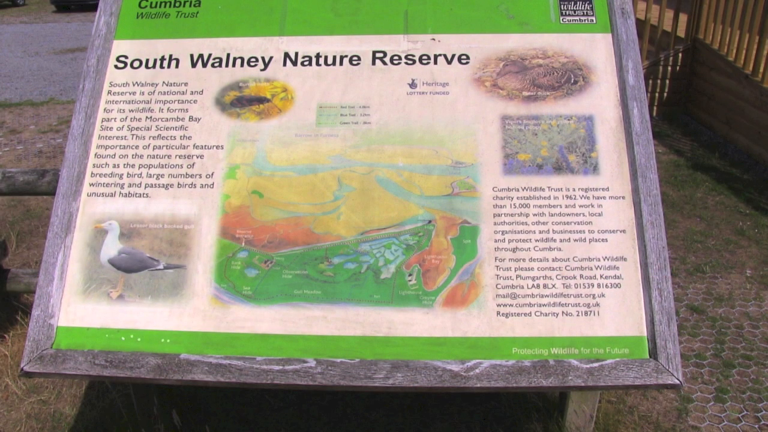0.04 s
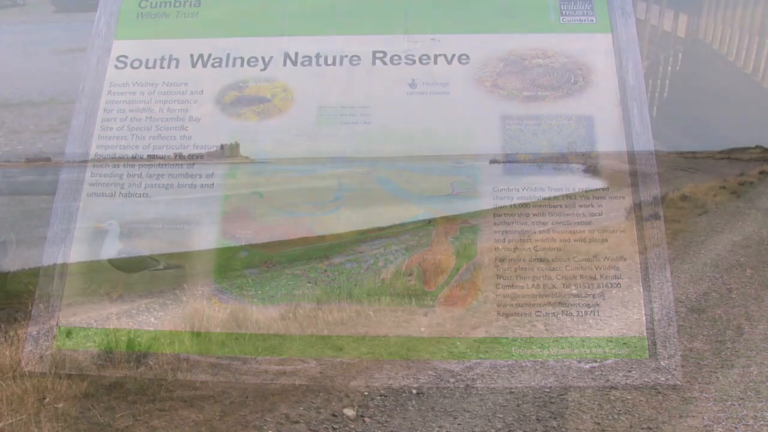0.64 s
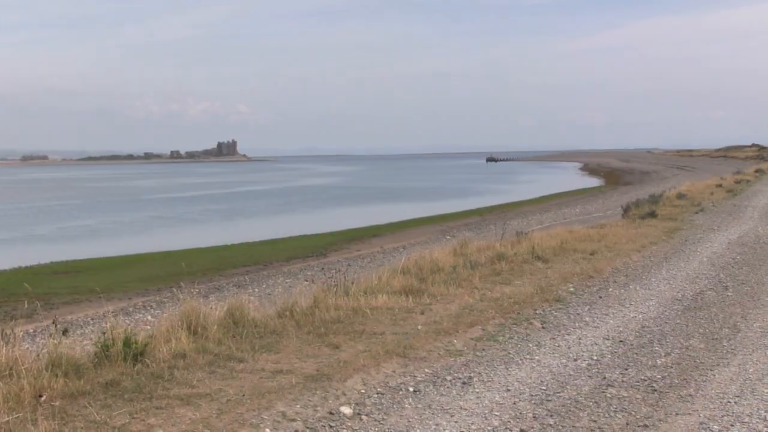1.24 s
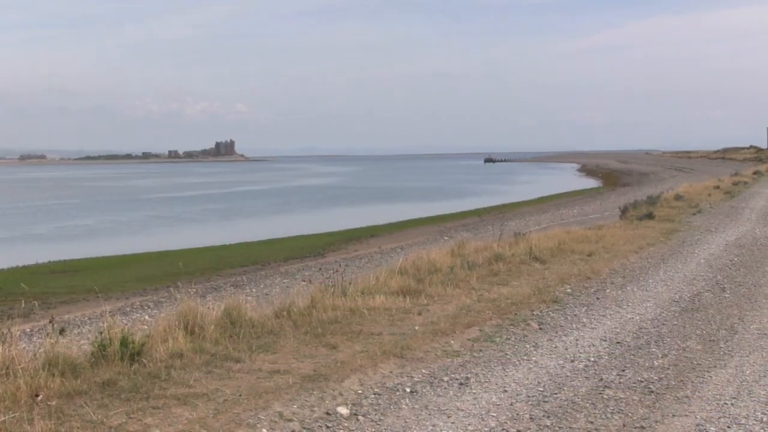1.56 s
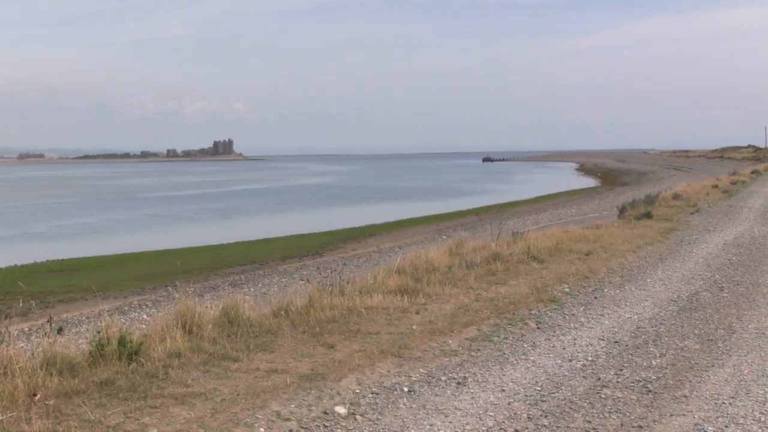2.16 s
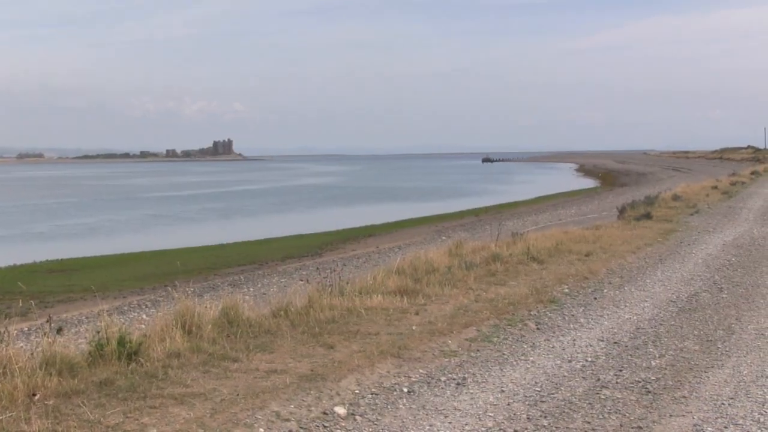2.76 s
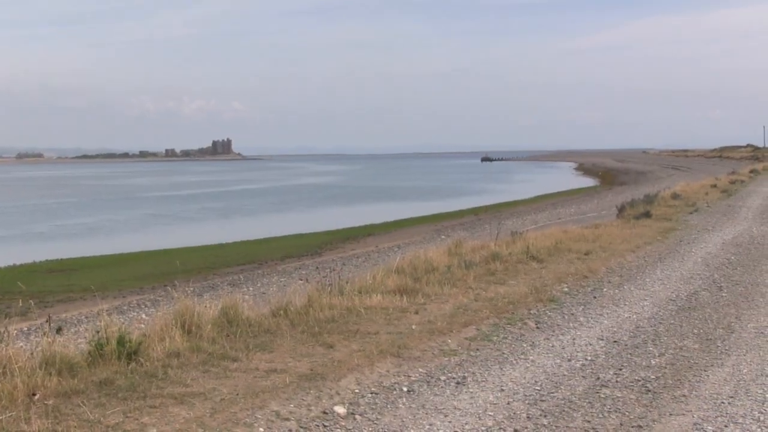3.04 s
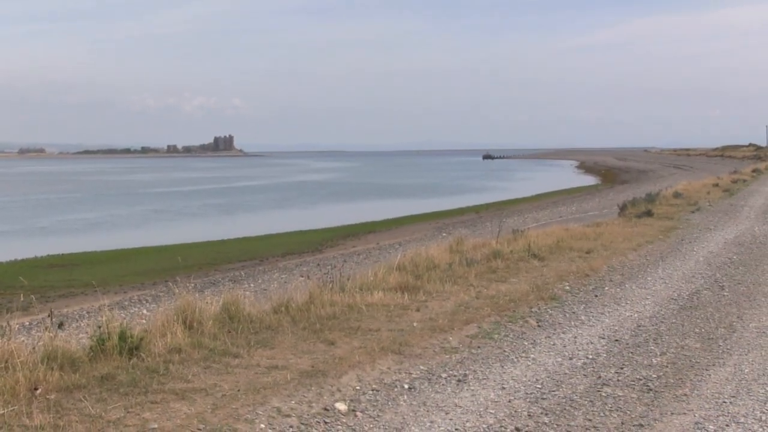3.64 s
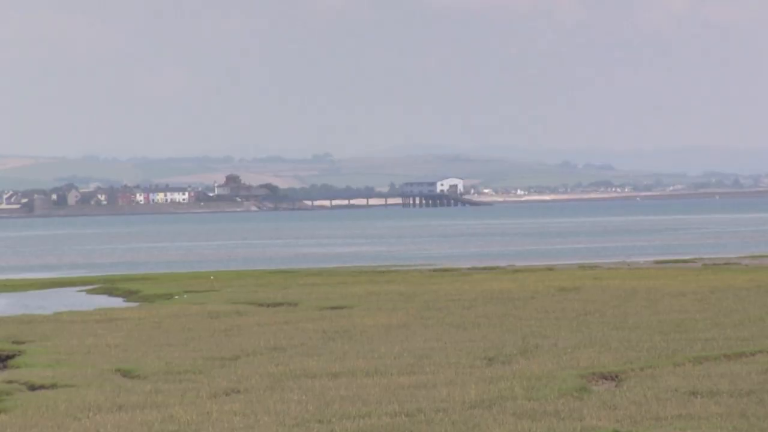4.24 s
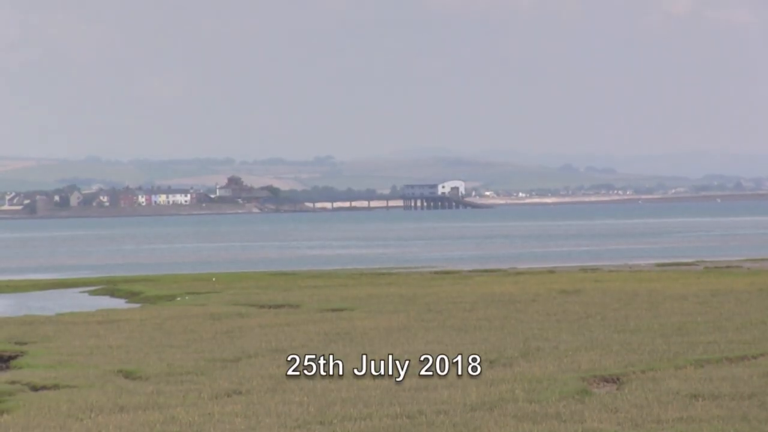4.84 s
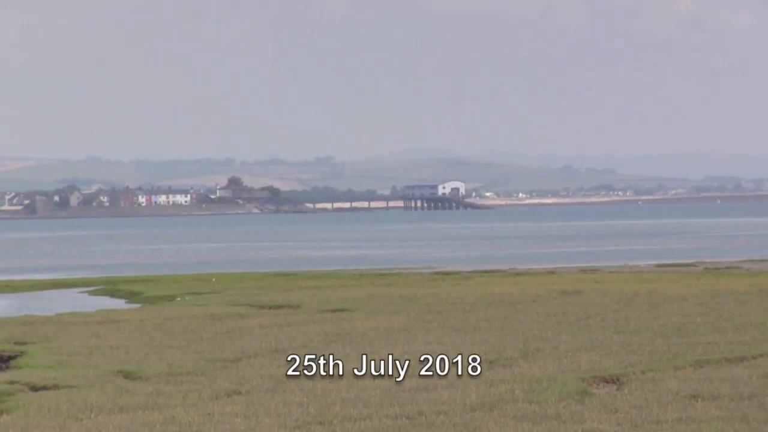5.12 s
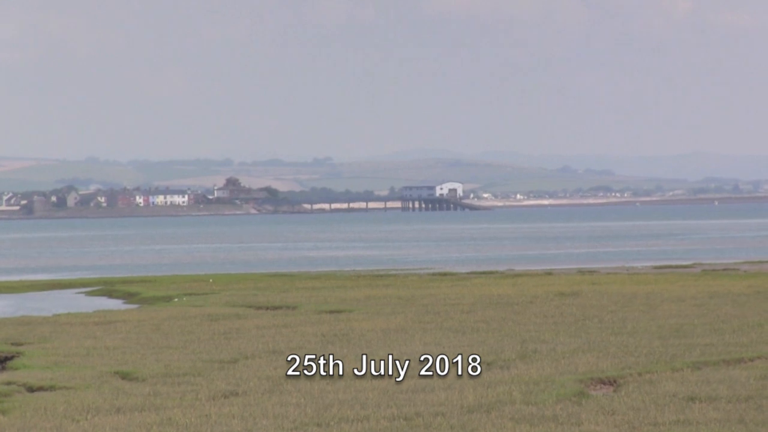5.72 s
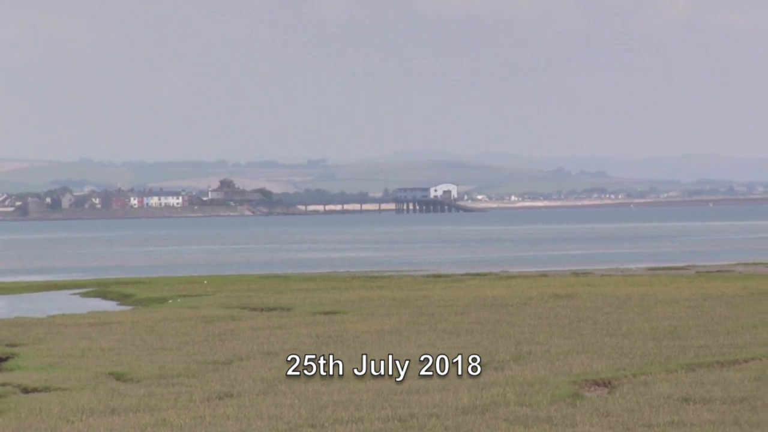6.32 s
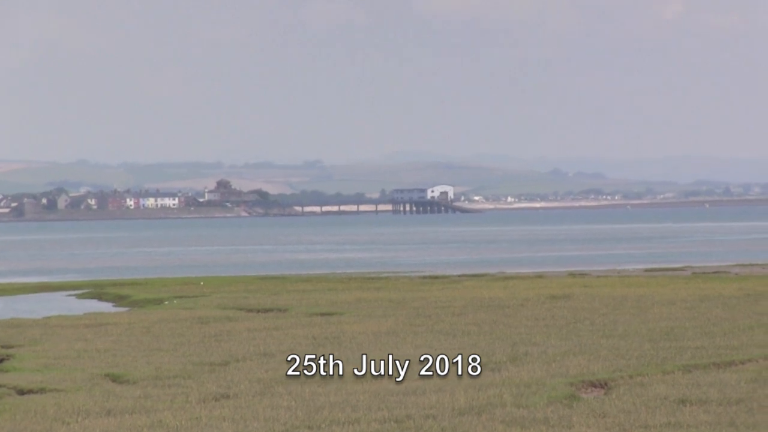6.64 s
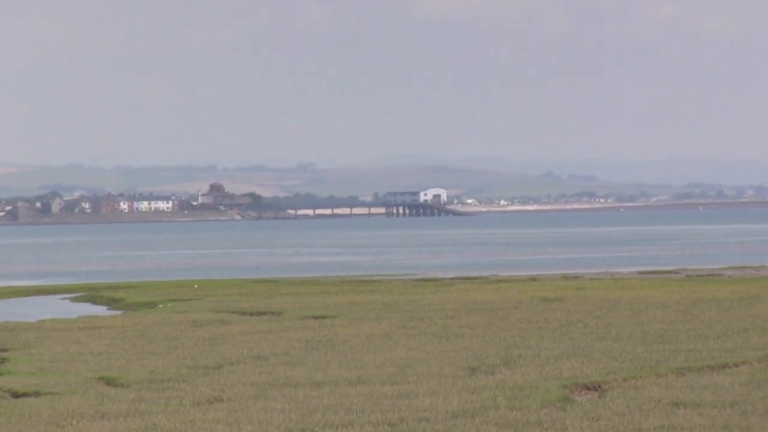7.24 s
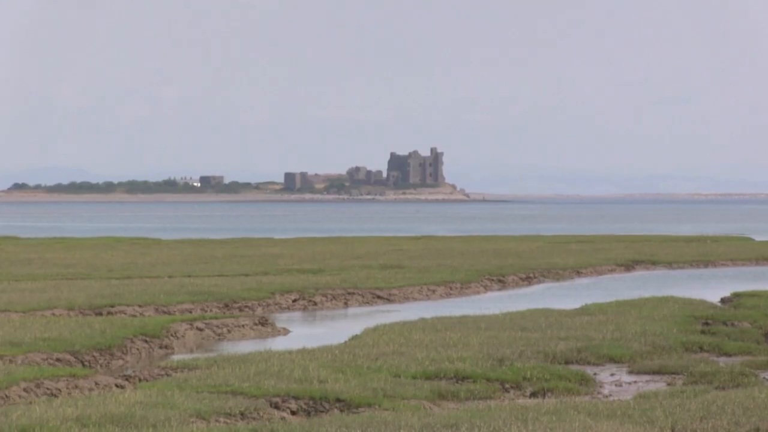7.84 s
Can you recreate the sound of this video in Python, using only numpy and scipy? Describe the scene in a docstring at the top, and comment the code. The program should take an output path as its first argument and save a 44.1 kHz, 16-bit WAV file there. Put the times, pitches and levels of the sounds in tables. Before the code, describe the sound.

Wind rumbles unevenly on the microphone at an open shore, over a soft hiss of air and grass. For the first second and a half, distant gulls wail, squeal and rattle, with faint colony chatter behind them. A wading bird close by gives four sharp, very short calls, the loudest sounds, at about 1.4, 2.0, 3.7 and 4.5 seconds. Thin, faint twitters run from 3.5 to 4.3 seconds, and a few small knocks and dry ticks fall mostly between 3.4 and 5.5 seconds. The gusts thump hardest around 4.4 seconds, then ease into a brief lull. From about 6 seconds a broader wash of wind over water comes in, with a faint low hum, light grass rustles and far bird chatter. A small bird gives two quick, high chips near 7.4 seconds, and the wash continues until about 8 seconds.

```python
"""Birds on a breezy shore

Close by, a wading bird gives four sharp, arched 'kip' calls. Far gulls wail, squeal and rattle, a colony
chatters, and small birds twitter and chip twice. Each voice is a gliding tone, most with overtones.
Gusts buffet the microphone, and a few small knocks and ticks ring near it. The hiss of air and grass
gives way to the broader wash of wind over open water; both are noise shaped band by band."""
import sys
import numpy as np
from scipy import signal
from scipy.io import wavfile
from scipy.ndimage import uniform_filter1d, map_coordinates

SR = 44100
rng = np.random.default_rng(int(sys.argv[2]) if len(sys.argv) > 2 else 0)


def log_audio(samples):
    """Write samples as a 16-bit WAV file to the path given in sys.argv[1]."""
    # one column per channel
    frames = np.atleast_2d(samples).T
    # limit to full scale, then quantise
    limited = np.clip(frames, -1, 1)
    pcm = np.round(limited * 32767).astype(np.int16)
    wavfile.write(sys.argv[1], SR, pcm)


N = 356328
TIME = np.arange(N) / SR


def from_db(db):
    """Turn decibels into a gain to multiply by."""
    return 10 ** (np.asarray(db) / 20)


def rms_one(x):
    """Scale a sound so its average strength (rms) is 1."""
    return x / np.sqrt(np.mean(x ** 2) + 1e-20)


def read(rows, at):
    """Look up a table by its first column, drawing straight lines between rows."""
    key, *columns = np.transpose(rows)
    return [np.interp(at, key, c) for c in columns]


def at_hz(rows, hz):
    """Look up a table by frequency, with every octave equally wide."""
    key, *columns = np.transpose(rows)
    return [np.interp(np.log(hz), np.log(np.maximum(key, 1)), c) for c in columns]


def drift(per_s, size):
    """A random wander, roughly between -1 and 1, that turns per_s times a second."""
    place = np.arange(size) * per_s / SR
    return map_coordinates(rng.standard_normal(int(place[-1]) + 2), [place], order=1)


def add(out, start_s, sound):
    """Mix a sound in at a given time."""
    start = max(int(start_s * SR), 0)
    out[:, start:start + sound.shape[-1]] += sound[..., :N - start]


def band(x, low_hz, high_hz):
    """Keep what lies between two frequencies."""
    sos = signal.butter(2, [low_hz, min(high_hz, SR * .45)], "band", fs=SR, output="sos")
    return signal.sosfilt(sos, x)


def pan(left_db):
    """Left and right gains, with the left louder by left_db."""
    ears = from_db(np.array([left_db, -left_db]) / 2)
    return ears / ears.mean(axis=0)


def banded_noise(spectrum, likeness, flicker_db, flicker_per_s):
    """Stereo noise in half-octave bands that each flicker. Likeness 1 means both ears hear the same."""
    edges = 20 * 2 ** (np.arange(21) / 2)
    out, white = 0, rng.standard_normal((2, 2, N))
    for k, (low, high) in enumerate(zip(edges, edges[1:])):
        if high < spectrum[0][0] or low > spectrum[-1][0]:
            continue
        mid, side = band(white[k % 2], low, high)
        hz = np.sqrt(low * high)
        alike = np.clip(at_hz(likeness, hz)[0], -1, 1)
        gain = from_db(at_hz(spectrum, hz)[0] + flicker_db * drift(flicker_per_s, N))
        out = out + gain * (np.sqrt(1 + alike) * mid + np.sqrt(1 - alike) * side * [[1], [-1]])
    return rms_one(out)


def shore(x, tail_db, fade_s):
    """Ground and banks scatter a weak, dull tail that falls 60 dB in fade_s."""
    t = np.arange(SR // 2) / SR
    tail = band(rng.standard_normal((2, len(t))), 730, 5300) * from_db(-60 * t / fade_s) * (t > .004)
    tail /= np.sqrt(np.sum(tail ** 2) / 2)
    return x + from_db(tail_db) * signal.fftconvolve(x, tail, axes=1)[:, :N]


def echo(x, delay_s, gain_db):
    """One reflection: a later, quieter copy."""
    return from_db(gain_db) * np.array([np.interp(TIME - delay_s, TIME, c, left=0) for c in x])


# How the rush of air and the hiss of grass rise and fall: time_s, rush_db, hiss_db
AIR_LEVELS = [(0, -53.5, -57.5), (1.08, -54, -57.5), (1.44, -51.5, -55.5), (1.83, -50.5, -56),
              (1.9, -57, -61), (5.06, -56, -61), (5.33, -60.5, -64), (5.58, -59.5, -65.5), (5.9, -54, -60),
              (6.37, -48.5, -55), (7.3, -49, -54.7), (8.08, -48, -56.5)]
# How much of the rush is the wash over water: time_s, share (0 to 1)
WATER_SHARE = [(5.4, 0.01), (6.0, 0.96)]
# The tone colour of air, wash and grass: frequency_hz, level_db
AIR_SPECTRUM = [(200, 3), (450, 0.5), (700, -0.5), (1100, -5), (2000, -6.5), (3500, -12), (6000, -17.5),
                (12000, -43)]
WASH_SPECTRUM = [(90, -13), (160, -19), (260, -8), (415, -14), (640, -5.5), (900, -14.5), (1350, -7.5),
                 (1850, -20.5), (2150, -18), (2680, -17), (4500, -29.5), (6500, -55)]
GRASS_SPECTRUM = [(1500, -10), (3500, -1), (6000, 0), (9000, -1), (12500, -4.5), (15500, -9)]
# How alike the two ears are: frequency_hz, likeness
AIR_STEREO = [(100, 0.75), (300, 0), (640, 0), (1400, 0.33), (3100, 0.58), (6800, 0.69), (15000, 0.91)]
WASH_STEREO = [(60, 1), (130, 1), (290, 0.16), (640, 0.52), (1410, 0.36), (3100, 0.67), (6820, 0.68),
               (15000, 0.72)]


def air(body_gain_db=6.5, wash_gain_db=6.0, grass_gain_db=3):
    """Rushing air fades into the wash of wind over open water, with hissing grass on top."""
    rush_db, hiss_db = read(AIR_LEVELS, TIME)
    water = np.clip(read(WATER_SHARE, TIME)[0], 0, 1)
    body = banded_noise(AIR_SPECTRUM, AIR_STEREO, flicker_db=1.0, flicker_per_s=16)
    wash = banded_noise(WASH_SPECTRUM, WASH_STEREO, flicker_db=.56, flicker_per_s=9)
    grass = banded_noise(GRASS_SPECTRUM, AIR_STEREO, flicker_db=.7, flicker_per_s=26)
    body *= from_db(body_gain_db) * np.sqrt(1 - water)
    wash *= from_db(wash_gain_db) * np.sqrt(water)
    return from_db(rush_db) * (body + wash) + from_db(hiss_db + grass_gain_db) * grass


# A faint, far hum: pitch_hz, width_hz, level_db
DRONE_BANDS = [(103, 41, -48.5), (194.4, 41, -50.5)]


def drone():
    """Two low, wavering bands of noise carry over the water and fade in with the wash."""
    hum = 0
    for hz, width_hz, db in DRONE_BANDS:
        noise = rng.standard_normal(N) + .08 * rng.standard_normal((2, N))
        hum = hum + from_db(db) * rms_one(band(noise, hz - width_hz / 2, hz + width_hz / 2))
    return hum * np.clip(read(WATER_SHARE, TIME)[0], 0, 1)


# Gusts stirring dry grass: peak_s, half_length_s, level_db
GRASS_SWELLS = [(5.875, .04, -59.5), (6.25, 0.16, -59.5), (6.635, 0.054, -57), (7.1, 0.05, -52.5),
                (7.41, 0.091, -56), (7.873, .06, -57)]


def rustles(grain_db=8.0):
    """Dry stems brush together in short, grainy swells."""
    swell = sum(from_db(db) * np.exp(-((TIME - s) / half) ** 2 / 2) for s, half, db in GRASS_SWELLS)
    stems = rng.standard_normal(N) + .6 * rng.standard_normal((2, N))
    grains = from_db(grain_db * np.minimum(drift(400, N), 2))
    return swell * rms_one(band(stems * grains, 7000, 11600))


# The breeze between gusts: time_s, level_db
BREEZE_LEVELS = [(0, -40.5), (.1, -56), (.25, -54), (.62, -45), (.96, -43.5), (1.07, -55), (1.3, -44),
                 (1.6, -41.5), (2.65, -41.5), (2.75, -50.5), (3.4, -53), (3.7, -46.5), (4.8, -40),
                 (5.25, -45.5), (5.62, -59.5), (6.85, -46.5), (7.5, -46.5), (8.08, -60)]
# Gusts on the microphone: start_s, length_s, level_db
WIND_GUSTS = [(0.303, 0.19, -30.5), (.825, 0.032, -40), (1.297, .075, -30), (1.501, 0.051, -27.5),
              (1.697, 0.044, -30), (1.934, 0.026, -35.5), (2.041, .05, -36.5), (2.398, 0.037, -36),
              (2.52, 0.057, -36.5), (2.982, 0.12, -35.5), (3.47, 0.06, -32.5), (3.714, 0.026, -32),
              (3.862, .035, -36), (3.972, 0.025, -34), (4.08, .075, -30), (4.275, .025, -35),
              (4.341, 0.089, -23.5), (4.616, 0.044, -25.5), (4.915, 0.038, -33), (5.06, 0.033, -33),
              (5.162, 0.058, -31.5), (5.409, 0.023, -38), (6.483, .025, -40.5), (7.39, 0.069, -39)]


def wind_strength(flutter_db=5, churn_db=2.5, rise_db_per_s=650, fall_db_per_s=502):
    """The wind's gain: a fluttering breeze plus gusts that rise, hold and die, all churning quickly."""
    power = from_db(read(BREEZE_LEVELS, TIME)[0] + flutter_db * drift(26, N)) ** 2
    for s, length, db in WIND_GUSTS:
        below_db = np.maximum((s - TIME) * rise_db_per_s, (TIME - s - length) * fall_db_per_s)
        near = below_db < 60
        power[near] += from_db(db - np.maximum(below_db[near], 0)) ** 2
    return np.sqrt(power) * from_db(churn_db * drift(50, N))


# The tone colour of the wind's rumble: frequency_hz, level_db
WIND_SPECTRUM = [(22, -23.5), (35, 1), (53, 2), (103, 3), (157, -3), (244, -14), (420, -44), (550, -72)]
# How alike the two ears are: frequency_hz, likeness
WIND_STEREO = [(30, 0.92), (70, 0.67), (150, -0.09), (300, -0.24)]
# Which side the wind hits harder: time_s, left_louder_db
WIND_SIDE = [(0, -2.5), (.5, 6), (1.0, 1), (1.3, -4.5), (3.0, -2), (4.35, -5.5), (5.0, -2.5), (6.5, -1),
             (7.4, -1), (8.0, 3)]


def wind(gain_db=-0.6, evenness=.88):
    """Swirls of air on the microphone make a lumpy bass that swells with each gust."""
    swirls = banded_noise(WIND_SPECTRUM, WIND_STEREO, flicker_db=1.5, flicker_per_s=22)
    swell = np.sqrt(uniform_filter1d(np.mean(swirls ** 2, axis=0), size=3000))
    steady = swirls / swell ** evenness   # flatten chance swells so the gusts set the loudness
    return steady * pan(read(WIND_SIDE, TIME)[0]) * from_db(gain_db) * wind_strength()


# Single swirls that thump the microphone: peak_s, pitch_hz, level_db
WIND_THUMPS = [(.372, 85, -27), (1.37, 75, -28), (1.516, 80, -29), (1.73, 80, -28), (2.227, 75, -28),
               (2.667, 70, -25), (3.08, 85, -27), (4.143, 60, -22), (4.358, 100, -21), (4.43, 120, -24),
               (7.403, 90, -29)]


def thumps(half_width_cycles=.51):
    """A big swirl pushes and pulls the microphone once, a little differently on either side."""
    out, t = np.zeros((2, N)), np.arange(-SR // 25, SR // 25) / SR
    for s, hz, db in WIND_THUMPS:
        cycles = hz * t * (1 + .066 * rng.standard_normal((2, 1)))
        phase = 2 * np.pi * cycles + rng.uniform(0, 2 * np.pi) + .91 * rng.standard_normal((2, 1))
        push = np.sin(phase) * np.exp(-(cycles / half_width_cycles) ** 2)
        add(out, s + t[0], from_db(db + np.array([[-1.5], [1.5]])) * push)
    return out


# Dull knocks and light, dry ticks: start_s, level_db, brightness_db_per_octave
KNOCK_HITS = [(3.397, -36, -6), (3.993, -31, -3), (4.982, -25.5, -0.5), (5.545, -28.5, -1)]
TICK_HITS = [(.398, -47, -6), (1.52, -40, 8), (3.965, -41, 8), (4.15, -38, 4), (4.2, -37.5, -3),
             (4.485, -36, -1), (5.008, -49, 1)]
# The tones that ring in each: pitch_hz, level_db, fade_s (time to fall 60 dB)
KNOCK_TONES = [(530, -8, 0.012), (835, -4, .018), (1210, 1.5, 0.008), (1510, 1, 0.018), (2360, 1.5, 0.0051),
               (3030, 3, 0.0061)]
TICK_TONES = [(4140, 7.5, 0.0074), (6460, 2, 0.021), (8060, 1, 0.0066), (10200, -4, .006)]


def taps(hits, tones, noise_db, noise_fade_s):
    """Each tap rings a few brief tones and leaves a short puff of noise."""
    out, t = np.zeros((2, N)), np.arange(SR // 10) / SR
    hz, tone_db, fade_s = np.transpose(tones)[:, :, None]
    signs = (-1) ** np.arange(len(tones))[:, None]
    for s, db, brightness in hits:
        strength_db = tone_db + brightness * np.log2(hz / np.median(hz)) + rng.normal(0, 1.6, hz.shape)
        rings = signs * from_db(strength_db - 60 * t / fade_s) * np.sin(2 * np.pi * hz * t)
        puff = rms_one(band(rng.standard_normal((2, len(t))), tones[0][0] / 2, tones[-1][0]))
        puff *= from_db(noise_db - 60 * t / noise_fade_s)
        add(out, s, from_db(db) * (rings.sum(axis=0) / 2 + puff))
    return out


def bird_note(contour, harmonics_db, side, jitter, shimmer_db, bloom=.091):
    """A bird's voice follows rows of time_s, pitch_hz, level_db, wavering in pitch and loudness."""
    start_s = contour[0][0]
    t = np.arange(start_s, max(contour[-1][0], start_s + .005), 1 / SR)
    hz, level_db = read(contour, t)
    hz = hz * (1 + jitter * drift(700, len(t)))
    phase = 2 * np.pi * np.cumsum(hz) / SR
    edge_fade = np.minimum(1, np.minimum(t - t[0], t[-1] - t) / .00042)
    out = 0
    for k, harmonic_db in enumerate(harmonics_db, 1):   # harmonic k sounds at k times the pitch
        left_db, lead = at_hz(side, k * hz)
        own_db = harmonic_db(hz) if callable(harmonic_db) else harmonic_db
        bloom_db = bloom * (k > 1) * (level_db - level_db.max())   # quieter moments are duller
        gain = from_db(level_db + own_db + bloom_db + shimmer_db * k * drift(199.4, len(t)))
        out = out + gain * pan(left_db) * np.sin(k * phase + np.array([lead, -lead]) / 2)
    return np.sqrt(2) * edge_fade * out


# Bursts of far chatter: start_s, end_s, call_count, lowest_hz, highest_hz, call_level_db
COLONY_BURSTS = [(0.143, 0.167, 3, 1290, 2010, -58), (0.476, 0.499, 4, 1490, 2097, -55.5),
                 (1.168, 1.426, 7, 1280, 2724, -56.5), (1.694, 1.799, 7, 1214, 2000, -60),
                 (4.68, 5.153, 4, 2390, 2570, -68), (6.299, 6.451, 5, 1414, 2820, -60.5),
                 (6.504, 8.002, 20, 2200, 3110, -60)]
# Where the colony and small birds are heard: frequency_hz, left_louder_db, left_lead_radians
BIRD_DIRECTION = [(4400, -10.5, 0.0048), (8000, 6, 0)]


def colony():
    """Many far birds give short, hoarse, rising cries, blurred by distance."""
    out = np.zeros((2, N))
    for start, end, count, low_hz, high_hz, db in COLONY_BURSTS:
        for when, pitch, length in rng.random((round(count), 3)):
            s = start + when * (end - start)
            hz = low_hz + pitch * (high_hz - low_hz)
            span = .0383 + .0473 * length
            cry = [(s, hz * .9, db - 4), (s + span / 2, hz, db), (s + span, hz * 1.1, db - 3)]
            add(out, s, bird_note(cry, [0, -15], BIRD_DIRECTION, jitter=.025, shimmer_db=4.5))
    return shore(out, tail_db=-7.5, fade_s=.25)


# A small bird's chips: start_s, length_s, first_hz, settling_hz, level_db
CHIP_NOTES = [(7.331, 0.027, 6670, 5130, -27), (7.406, 0.034, 7250, 5260, -30.5)]


def chips(fall_s=.0076, attack_s=.007, release_s=.013, fade_db=16.5, lead_in_s=.0075):
    """After a faint lead-in note, a pure tone drops fast and settles."""
    out = np.zeros((2, N))
    for s, length, first_hz, last_hz, db in CHIP_NOTES:
        lead_in = [(s - lead_in_s, first_hz * .92, db - 18),
                   (s - lead_in_s / 2, first_hz * .85, db - 13), (s, first_hz * .71, db - 19)]
        t = np.linspace(0, length, 24)
        hz = last_hz + (first_hz - last_hz) * np.exp(-t / fall_s)
        faded = np.maximum(0, np.maximum(1 - t / attack_s, 1 - (length - t) / release_s))
        chip = np.transpose([s + t, hz, db - fade_db * faded])
        for note in (lead_in, chip):
            add(out, note[0][0], bird_note(note, [0, -36], BIRD_DIRECTION, jitter=.0051, shimmer_db=0))
    return out


# Thin, far twitters: start_s, top_hz, level_db
TWITTER_NOTES = [(3.51, 7300, -62), (3.595, 7000, -61), (3.675, 7450, -59), (3.78, 7400, -60),
                 (3.928, 7100, -58), (4.012, 7250, -55), (4.095, 7100, -54), (4.22, 6900, -61)]


def twitters():
    """Small birds whistle tones that slide up and level off."""
    out = np.zeros((2, N))
    for s, hz, db in TWITTER_NOTES:
        slide = [(s, hz * .82, db - 9), (s + .021, hz * .97, db),
                 (s + .028, hz, db), (s + .042, hz * .96, db - 7)]
        add(out, s, bird_note(slide, [0], BIRD_DIRECTION, jitter=.01, shimmer_db=3.5))
    return out


# Where the gulls are heard: frequency_hz, left_louder_db, left_lead_radians
GULL_DIRECTION = [(1400, -15, 0.55), (2300, -8.5, 0), (4400, -10.5, 0.31)]
# Three-part wails: start_s, opening_s, upper_s, tail_s, opening_hz, top_hz, opening_db, upper_db, tail_db
WAIL_CALLS = [(0, 0.0035, .15, 0.07, 1666, 1665, -43, -44, -40),
              (.505, .091, .115, .01, 1468, 1810, -40.5, -45.5, -55),
              (.675, .103, .038, .066, 1482, 1750, -35.5, -37, -35),
              (.985, .025, .028, .053, 1416, 1680, -43, -42, -35),
              (1.23, 0.016, .03, 0.023, 1390, 1580, -45, -43.5, -41)]


def gull_wails(break_s=.007, tail_start_hz=1377, tail_end_hz=1275, fade_db=15):
    """A gull's voice opens low, breaks up into a high arch, then breaks down into a sinking tail."""
    out = np.zeros((2, N))
    # the throat mutes the first overtone of the highest notes
    overtone_db = lambda hz: np.interp(hz, [1320, 1500, 1607, 1760], [-7.5, -20, -13, -30])
    for s, opening, upper, tail, opening_hz, top_hz, opening_db, upper_db, tail_db in WAIL_CALLS:
        up, down = s + opening, s + opening + upper
        wail = [(s, opening_hz, opening_db - fade_db),
                (s + opening / 2, opening_hz, opening_db),
                (up, opening_hz, opening_db - .5),
                (up + break_s, top_hz * .965, upper_db),
                (up + upper * .3, top_hz, upper_db),
                (up + upper * .77, top_hz * .985, upper_db),
                (down, top_hz * .927, upper_db + 2),
                (down + break_s, tail_start_hz, tail_db),
                (down + break_s + tail / 2, (tail_start_hz + tail_end_hz) / 2, tail_db - 2.5),
                (down + break_s + tail, tail_end_hz, tail_db - fade_db)]
        add(out, s, bird_note(wail, [0, overtone_db, -32], GULL_DIRECTION, jitter=.0094, shimmer_db=1.5))
    return out


# Higher squeals: start_s, length_s, first_hz, top_hz, level_db
SQUEAL_CALLS = [(.52, 0.11, 2170, 2230, -47.5), (1.04, .103, 2210, 2390, -31)]


def gull_squeals(top_at=.63, droop_share=.19, fade_db=16.5):
    """A squeal starts suddenly, rises slowly, then droops ever faster as it fades."""
    out, progress = np.zeros((2, N)), np.linspace(0, 1, 21)
    rise = np.minimum(progress / top_at, 1) ** 1.3
    droop = droop_share * (np.maximum(progress - top_at, 0) / (1 - top_at)) ** 2
    for s, length, first_hz, top_hz, db in SQUEAL_CALLS:
        hz = (first_hz + (top_hz - first_hz) * rise) * (1 - droop)
        squeal = np.transpose([s + progress * length, hz, db - fade_db * progress ** 2])
        add(out, s, bird_note(squeal, [0, -22, -20], GULL_DIRECTION, jitter=.004, shimmer_db=.5, bloom=1))
    return out


# Rattles: start_s, pulse_count, spacing_s, middle_hz, bow_share (how much lower the ends are), level_db
RATTLE_RUNS = [(0.9, 4, .0125, 1510, .08, -41), (.956, 5, .0183, 1305, -0.025, -37),
               (1.214, 5, .031, 1436, -.03, -48)]


def gull_rattle(harmonics_db=(-12, 3.5, -5, -11, -12)):
    """Short, reedy pulses come evenly spaced, their pitch bowing over each run."""
    out = np.zeros((2, N))
    for start, count, spacing, middle_hz, bow, db in RATTLE_RUNS:
        for k, place in enumerate(np.linspace(-1, 1, round(count))):
            s, hz = start + k * spacing, middle_hz * (1 - bow * place ** 2)
            pulse = [(s - .0045, hz * .99, db - 12), (s - .001, hz, db), (s + .0028, hz * .94, db - 8.5)]
            voice = bird_note(pulse, harmonics_db, GULL_DIRECTION, jitter=.028, shimmer_db=.66)
            add(out, pulse[0][0], voice)
    return out


def kip_contour(s, length, top_hz, level_db, lean, drop_share=.44, soften_db=9, bill_db=16.5):
    """One leaning arch of pitch, loudest at its top; the bill opens and closes quickly at the ends."""
    progress = np.linspace(0, 1, 41)
    from_top = np.abs(2 * progress - 1)
    return np.transpose([s + (progress - lean * np.sin(np.pi * progress)) * length,
                         top_hz * (1 - drop_share * from_top ** 2.13),
                         level_db - soften_db * from_top ** 2 - bill_db * from_top ** 8])


# The wader's calls: start_s, length_s, top_hz, level_db, dip_db (of the lowest harmonic, at the top),
# lean (above 0 peaks early), second_harmonic_extra_db, fifth_harmonic_extra_db
KIP_CALLS = [(1.442, .052, 2603, -12.5, -2.5, 0.04, 2, -5), (2.0269, .052, 2574, -11.5, 1, -0.0087, 0.5, 0),
             (3.714, .051, 2568, -12.5, 2, 0.014, 2.5, -5.5), (4.509, .055, 2626, -15, 12, -.045, 1.5, -6)]
# Its five harmonics, lowest first: level_db
KIP_HARMONICS_DB = [0, -26, -33, -30.5, -25.5]
# Where it is heard: frequency_hz, left_louder_db, left_lead_radians
WADER_DIRECTION = [(1700, -9.5, -0.19), (2200, -6.5, 0.28), (2600, -6.5, -.15), (5000, 10.5, 0),
                   (7550, -9.5, 0), (12000, -5, 0)]


def wader(dip_width_hz=230, rasp_db=-41):
    """Each kip starts with a low catch, then arches up and down with a slight rasp."""
    out = np.zeros((2, N))
    for s, length, top_hz, level_db, dip_db, lean, second_db, fifth_db in KIP_CALLS:
        arch = kip_contour(s, length, top_hz, level_db, lean)
        lowest_db = lambda hz: -dip_db * np.exp(-((hz - top_hz) / dip_width_hz) ** 2)
        harmonics_db = [lowest_db, *np.add(KIP_HARMONICS_DB[1:], [second_db, 0, 0, fifth_db])]
        add(out, s, bird_note(arch, harmonics_db, WADER_DIRECTION, jitter=.0045, shimmer_db=1, bloom=1.1))
        catch = [(s - .0015, 1250, level_db - 16), (s + .0031, 1600, level_db - 23)]
        add(out, catch[0][0], bird_note(catch, [-8, 0], WADER_DIRECTION, jitter=.02, shimmer_db=1))
    rough_air = rms_one(band(rng.standard_normal(N), 300, 11000))
    rasp = from_db(rasp_db) * out * rough_air
    out = out + rasp + echo(out, delay_s=.0036, gain_db=-14)   # a bounce off the ground ripples the call
    bank_echo = echo(out, delay_s=.102, gain_db=-47)
    out = shore(out, tail_db=-25, fade_s=.1) + bank_echo
    return shore(out, tail_db=-45.5, fade_s=.7)


def scene():
    """Birds and small taps over wind and hiss."""
    knocks = taps(KNOCK_HITS, KNOCK_TONES, noise_db=-14, noise_fade_s=.08)
    ticks = taps(TICK_HITS, TICK_TONES, noise_db=-3.5, noise_fade_s=.026)
    kips = wader()
    gulls = shore(gull_wails() + gull_squeals() + gull_rattle(), tail_db=-22, fade_s=.23)
    birds = kips + gulls + colony() + chips() + twitters()
    return birds + knocks + ticks + wind() + thumps() + air() + rustles() + drone()


def record(dry, cutoff_hz=15900):
    """Cut away the very highest treble steeply."""
    return signal.sosfilt(signal.ellip(12, .1, 80, cutoff_hz, fs=SR, output="sos"), dry)


dry = scene()
out = record(dry)
log_audio(out)
```